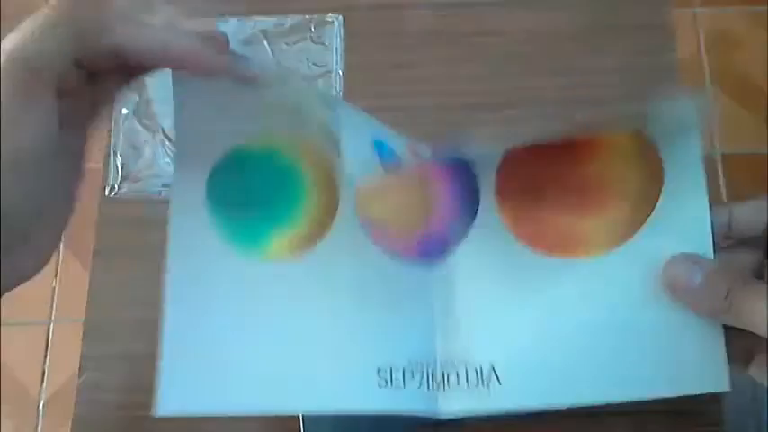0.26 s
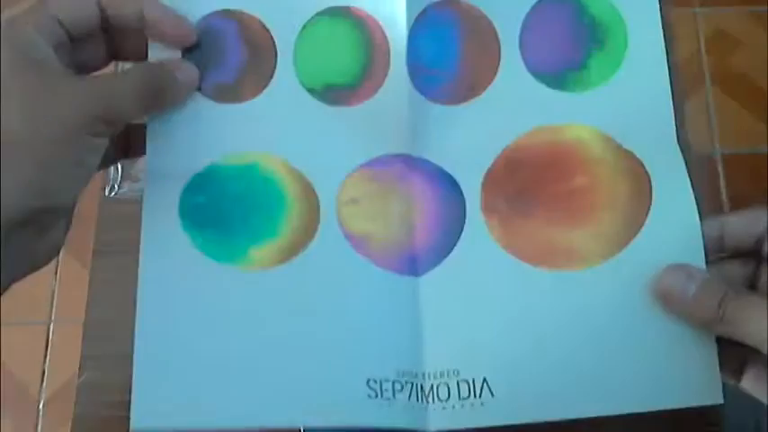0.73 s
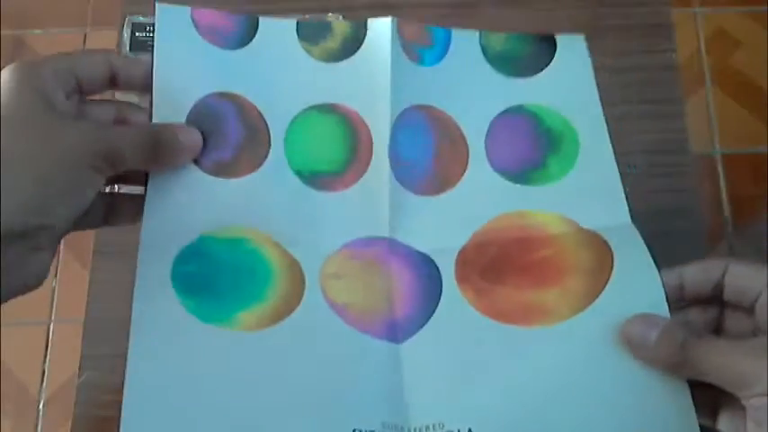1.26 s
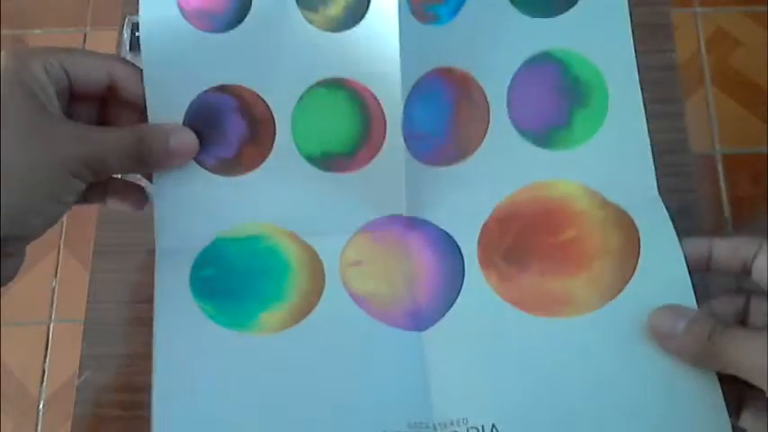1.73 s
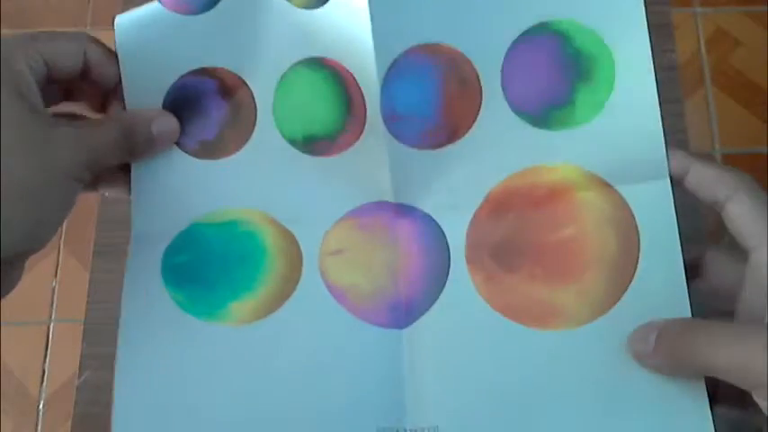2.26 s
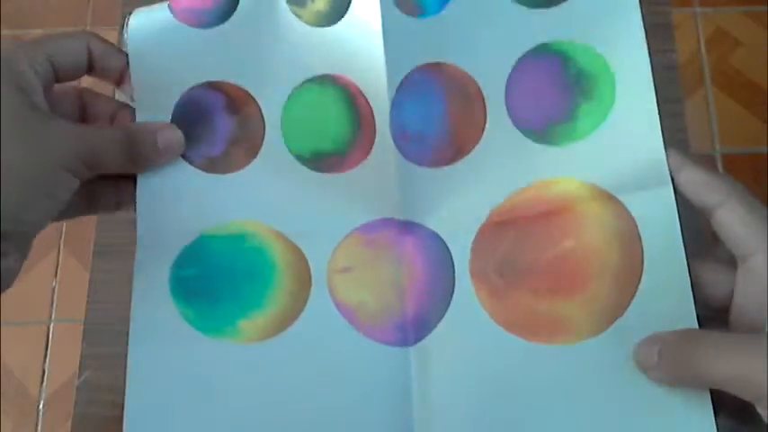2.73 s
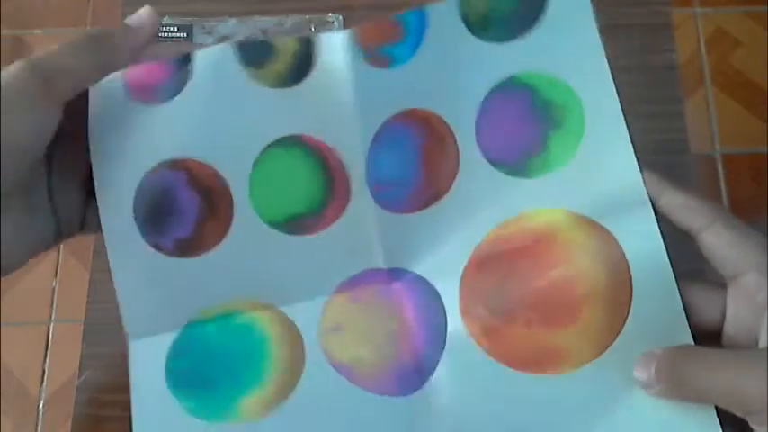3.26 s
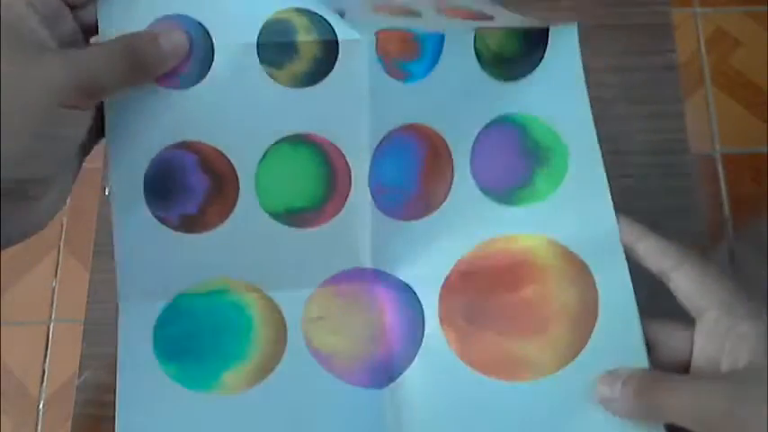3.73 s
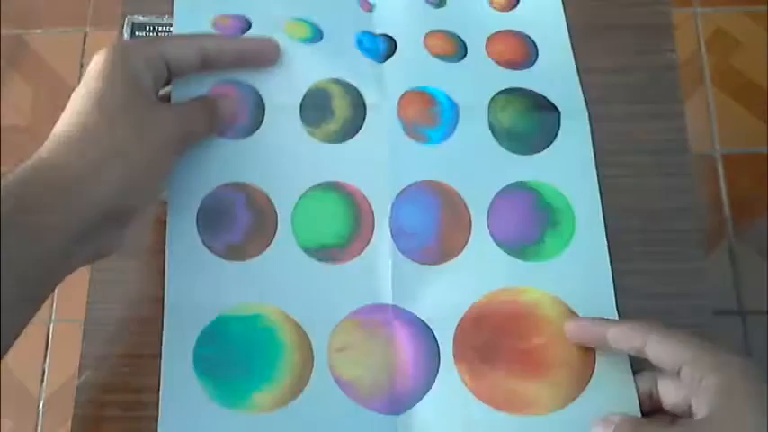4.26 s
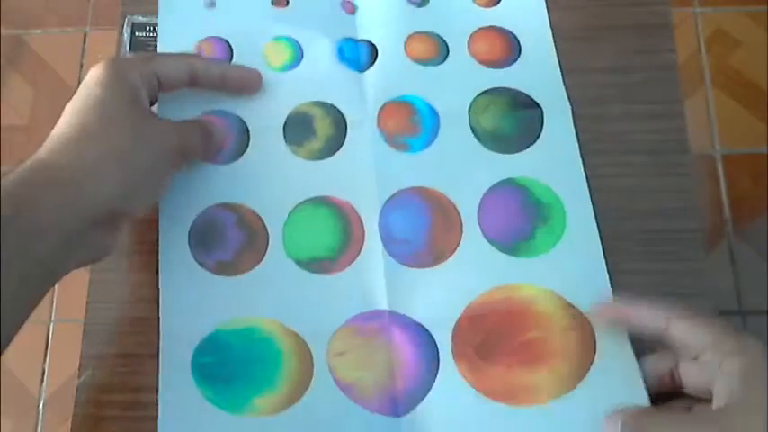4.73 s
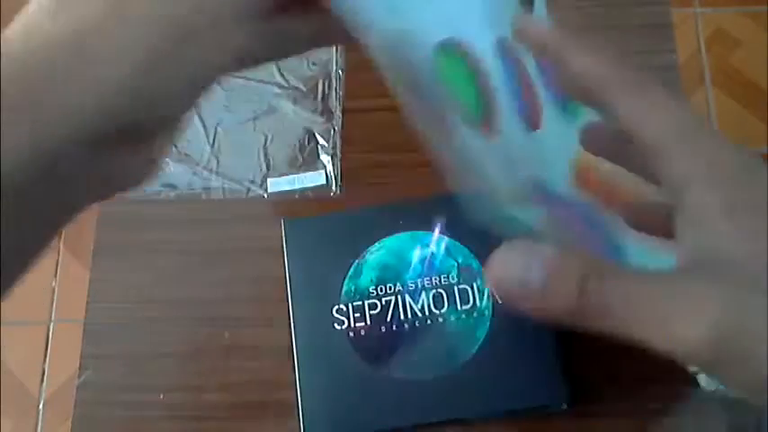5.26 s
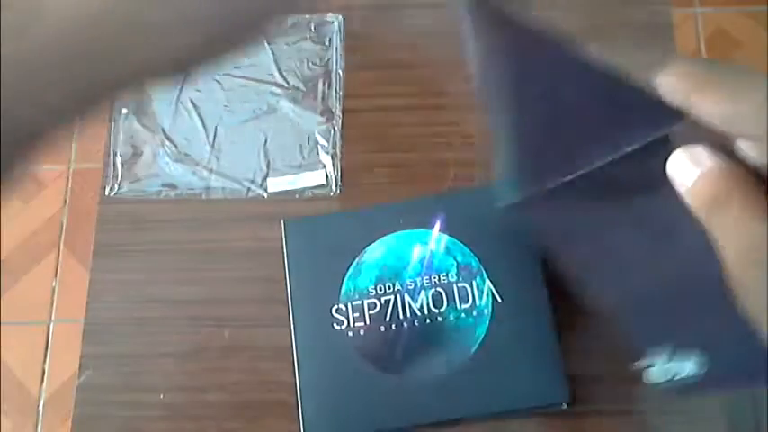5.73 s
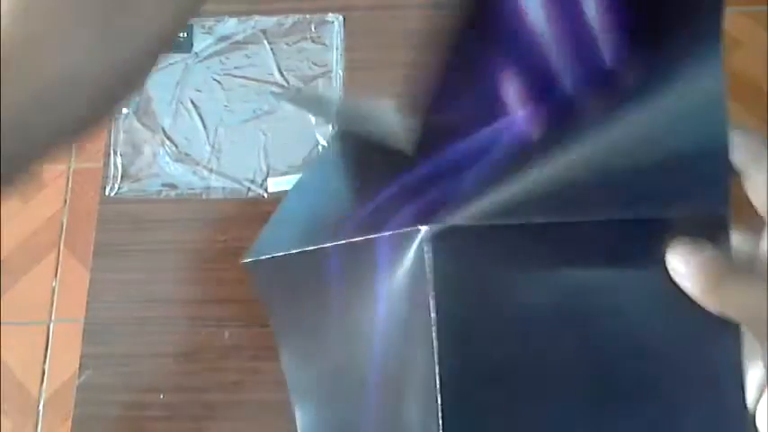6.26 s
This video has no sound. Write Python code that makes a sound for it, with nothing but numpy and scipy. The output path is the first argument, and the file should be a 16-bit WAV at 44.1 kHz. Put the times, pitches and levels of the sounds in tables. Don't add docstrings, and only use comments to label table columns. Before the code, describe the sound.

Dry, mid-pitched paper crinkles and pops in irregular clumps, the loudest snaps briefly distorting. Fingers scrape the edge and slide on the gloss, panels brush together with short swishes, and the sheet thumps the air softly. It ends with a brisk turn-over of the paper. Small indoor room, close boxy microphone, with low rumble, electrical hum and hiss.

```python
import sys
import numpy as np
from scipy import signal
from scipy.fft import rfft, irfft, next_fast_len
from scipy.io import wavfile
from scipy.ndimage import map_coordinates

SR = 44100
rng = np.random.default_rng(int(sys.argv[2]) if len(sys.argv) > 2 else 0)


def file_out(sig):
    cols = np.atleast_2d(sig).T
    lim = np.clip(cols, -1, 1)
    pcm = np.round(lim * 32767).astype(np.int16)
    wavfile.write(sys.argv[1], SR, pcm)


def voltage_ratio(level):
    return 10 ** (np.asarray(level, float) / 20)


N = 286393

# (f/Hz, level/dB)
FLAP_TONE = [(40, -27.5), (90, 6), (140, 7.5), (270, 4), (400, 5), (520, 2.5), (800, -49)]


def unit(x):
    return x / np.sqrt(np.mean(x ** 2) + 1e-20)


def along(points, hz):
    f, v = np.transpose(points)
    return np.interp(np.log(hz + 1), np.log(f + 1), v)


def curves(rows):
    s, *cols = np.transpose(rows)
    return [np.interp(np.arange(N) / SR, s, c) for c in cols]


def wobble(rate):
    knots = rng.standard_normal(int(N * rate / SR) + 4)
    return map_coordinates(knots, [np.arange(N) * rate / SR])


def coloured(x, spectrum):
    m = 8192
    gain = voltage_ratio(along(spectrum, np.fft.rfftfreq(m, 1 / SR)))
    cepstrum = irfft(np.log(gain + 1e-6))
    cepstrum[1:m // 2] *= 2
    cepstrum[m // 2 + 1:] = 0
    shape = irfft(np.exp(rfft(cepstrum)))[:m // 2]
    y = signal.fftconvolve(np.atleast_2d(x), shape[None], axes=1)
    return y[:, :np.shape(x)[-1]].reshape(np.shape(x))


def resonance(f, hz, width_hz):
    return 1j * f * width_hz / (hz ** 2 - f * f + 1j * f * width_hz)


def grains(per_s, spread_db, clump_db, clump_rate, bed):
    draw = rng.random((2, N))
    hit = draw[0] < per_s / SR
    size = voltage_ratio(-spread_db * np.log(draw[1] + 1e-9)) * rng.standard_normal(N)
    rough = unit(hit * size) + bed * rng.standard_normal(N)
    return rough * voltage_ratio(clump_db * wobble(clump_rate))


def all_creases():
    # (t/s, peak level/dB, ring f/Hz, crisp part level/dB, flap part level/dB)
    cracks = [(.0445, -9, 830, -7, -24), (0.845, -11.5, 850, -47, -13.5), (.932, -2, 892, -46, -56),
              (1.309, -11, 945, -32, -24), (1.339, -18, 880, -52, -21), (1.535, -9, 850, -38, -31),
              (1.5813, -3.5, 802, -53, -23), (1.5832, 4.2, 820, -50, -30), (2.294, -13.5, 840, -28, -16),
              (2.631, -8, 860, -27, -41), (2.667, -9, 856, -31, -21), (2.71, -11.5, 850, -38, -26),
              (2.9215, -14, 794, -25.5, -27), (3.0729, -6, 810, -52, -14.5), (3.0816, 2.6, 840, -32.5, -20),
              (3.0849, 1.3, 905, -44, -22), (3.843, -10.5, 990, -18, -12), (3.867, -6.5, 850, -58, -37),
              (3.9687, -9, 950, -23, -20.5), (4.004, -3.8, 1090, -15.5, -39),
              (4.7405, -19, 1210, -24.5, -34), (5.9548, -3, 800, -33, -12), (6.072, -13, 673, -23, -30),
              (6.43, -9, 950, -43, -22), (1.5872, -6, 880, -52, -36), (1.5893, -3, 900, -50, -20),
              (3.0763, -10, 790, -43, -19), (3.0908, -12, 840, -40, -27), (3.967, -18, 910, -30, -16),
              (4.012, -16, 990, -19, -28), (5.9515, -13.5, 1080, -13, -8.5), (5.972, -17.5, 810, -28, -11),
              (5.822, -28, 980, -18, -20), (5.849, -25, 900, -14, -24), (6.062, -23, 910, -15, -20),
              (6.212, -38, 1300, -20, -25), (0.0505, -18.5, 810, -22, -10), (.937, -9.5, 910, -40, -33),
              (5.9348, -8, 1180, -17, -13), (5.9431, -11, 980, -10, -29)]
    # (t/s, peak level/dB, ring f/Hz, crisp part level/dB)
    tears = [(.143, -24, 760, -26), (1.219, -20.5, 880, -21), (1.5, -16, 940, -31),
             (1.797, -21.5, 1020, -16.5), (1.842, -22, 980, -39), (1.942, -17.5, 960, -41),
             (1.998, -22, 720, -39), (2.212, -25, 820, -34), (2.499, -19, 1100, -25),
             (2.525, -17, 920, -27), (2.7, -13.5, 840, -22.5), (3.145, -13.5, 855, -51),
             (3.399, -18, 770, -32), (4.896, -22, 700, -35), (5.06, -20.5, 760, -39),
             (5.502, -23, 980, -32), (5.751, -18.5, 785, -31), (5.807, -17.5, 680, -32),
             (5.9209, -14, 900, -10), (5.93, -18, 1300, -18), (5.945, -16, 810, -32),
             (6.362, -17, 910, -29), (6.371, -22, 660, -43)]
    # (t/s, peak level/dB, ring f/Hz)
    pops = [(.177, -25.5, 676), (.514, -29, 815), (.644, -27, 850), (.68, -26, 755), (.702, -26, 910),
            (1.487, -20, 960), (1.514, -10.5, 940), (1.596, -18, 830), (1.806, -22, 1030),
            (1.874, -18.5, 920), (1.901, -16.5, 910), (1.913, -16, 920), (2.142, -25.5, 860),
            (2.537, -12.5, 910), (2.552, -19, 910), (2.771, -22, 840), (2.901, -17, 840), (3.022, -14, 800),
            (3.152, -9.5, 843), (3.506, -18, 945), (3.713, -8.5, 770), (3.723, -11, 870),
            (4.102, -14.5, 914), (3.826, -26, 935), (3.875, -7.5, 790), (4.725, -31, 960),
            (5.455, -19, 610), (6.317, -26, 834), (6.342, -18.5, 900)]
    # (t/s, peak level/dB, ring f/Hz)
    ticks = [(.16, -19.5, 920), (1.25, -16, 950), (1.659, -24, 950), (1.754, -18.5, 870), (2.243, -25, 900),
             (2.276, -27, 785), (2.334, -19, 1040), (2.379, -18, 990), (2.422, -21.5, 940),
             (2.445, -19.5, 980), (2.52, -22, 1020), (2.598, -14, 920), (2.651, -17.5, 860),
             (4.77, -18.5, 990), (4.809, -22, 790), (5.925, -20, 1290), (6.054, -20.5, 680)]
    # (t/s, peak level/dB, ring f/Hz)
    flips = [(.219, -24, 644), (.537, -29, 830), (.58, -30, 1070), (.59, -29, 835), (.726, -34, 770),
             (2.358, -20.5, 890), (2.724, -19.5, 790), (3.09, -19, 836), (3.227, -22, 664),
             (3.309, -26, 870), (3.68, -21, 850), (3.944, -23, 870), (5.049, -27, 920), (5.403, -23, 810),
             (5.94, -8, 640), (5.971, -13, 607), (6.091, -14.5, 800)]
    # (t/s, peak level/dB, ring f/Hz)
    further_pops = [(1.522, -13, 880), (1.556, -15, 880), (2.73, -16.5, 855), (3.066, -31, 850), (3.164, -22, 900),
                    (4.826, -21, 900), (4.845, -28, 800), (4.915, -18, 960), (4.965, -27, 770), (5.02, -28, 616),
                    (5.14, -27.5, 950), (5.293, -28, 1070), (1.626, -29, 900), (3.408, -18, 855), (3.52, -29, 880),
                    (3.553, -25, 980), (5.824, -21, 800), (6.1, -16, 860)]
    # (t/s, peak level/dB, ring f/Hz)
    links = [(1.7995, -11, 1080), (1.8135, -12, 1020), (1.8275, -13, 980), (1.836, -14, 980),
             (1.789, -20, 1000), (1.885, -20, 950), (1.958, -17, 1050), (1.73, -24, 900), (1.712, -24, 950),
             (2.011, -26, 800), (1.5445, -15, 900), (1.527, -16, 950), (1.502, -16, 900), (1.574, -21, 900),
             (1.601, -16, 830), (1.46, -22, 900), (2.9245, -9, 840), (2.968, -22, 850), (3.099, -13, 850),
             (3.1465, -11, 850), (3.86, -16, 900), (3.871, -10, 850), (2.632, -11, 860), (2.654, -15, 880),
             (2.67, -15, 840), (2.612, -23, 900), (4.9005, -12, 800), (4.7435, -15, 1030),
             (5.5065, -15, 1030), (5.589, -24, 1500), (5.608, -24, 900), (5.478, -26, 1100),
             (5.694, -23, 670), (1.293, -25, 800), (.907, -30, 800), (3.282, -25, 990), (3.641, -28, 850),
             (3.79, -24, 1000), (4.343, -27, 1040), (4.711, -28, 960), (5.095, -25, 770), (5.248, -29, 830),
             (5.332, -27, 1000), (6.132, -25, 830), (2.105, -32, 900), (.419, -34, 830), (.558, -31, 860),
             (4.241, -32, 890), (1.3425, -9, 830), (6.378, -15, 900), (6.486, -22, 900), (4.784, -23, 1000),
             (1.132, -27, 900), (5.963, -13, 750)]
    # (crisp part level/dB, flap part level/dB, die-away t60/s)
    link = (-38, -26, .012)
    pop, tick, flip = (-44, -29, 0.024), (-23, -15.5, 0.03), (-31, -10, 0.011)
    crack_t60_s, tear_t60_s, tear_flap_db = 0.016, 0.049, -16.5

    creases = [(*row, crack_t60_s) for row in cracks]
    creases += [(*row, tear_flap_db, tear_t60_s) for row in tears]
    for rows, kind in ((pops, pop), (ticks, tick), (flips, flip), (further_pops, pop), (links, link)):
        creases += [(*row, *kind) for row in rows]
    return creases


def snaps():
    # (f/Hz, level/dB)
    crisp_tone = [(900, 0.5), (1800, 1.5), (2500, -13), (3300, -25), (5000, -15), (6200, -2), (7400, -29.5),
                  (16000, -55)]
    s, peak_db, ring_hz, crisp_db, flap_db, t60 = (c[:, None] for c in np.transpose(all_creases()))
    size = 4096
    t, f = np.arange(size) / SR, np.fft.rfftfreq(2 * size, 1 / SR)
    noise = rng.standard_normal((len(s), 3 * size)).reshape(len(s), 3, size)

    onset = 1 - np.exp(-t / (0.00024 + 1.8 * t60 ** 2))
    fade = voltage_ratio(-60 * t / np.clip(t60, 0.004, 0.2)) * onset
    jump = np.sign(noise[:, 0, :1]) * 1.15 * np.exp(-(t60 / 0.056) ** 2)
    jump = jump * np.exp(-((t - 0.0004) / 0.00009) ** 2)

    sheet = resonance(f, ring_hz, 0.38 * ring_hz) ** 2 / (1 + 1j * f / 1300) ** 3
    ring = irfft(rfft(noise[:, 0] * fade + jump, 2 * size) * sheet)[:, :size]
    crisp = coloured(noise[:, 1] * fade ** 4.2, crisp_tone)
    flap = coloured(noise[:, 2] * fade ** 0.42, FLAP_TONE)

    def to_peak(v):
        return v / np.abs(v).max(1, keepdims=True)

    burst = to_peak(ring) + voltage_ratio(crisp_db + 6.5) * to_peak(crisp) + voltage_ratio(flap_db - 0.5) * to_peak(flap)
    burst = voltage_ratio(peak_db) * burst
    where = np.round((s - 0.0007) * SR).astype(int) + np.arange(size)
    return np.bincount(where.ravel(), burst.ravel(), N + size)[:N]


def strokes():
    # (firmest t/s, length/s, hiss on the gloss level/dB, scrape on the edge level/dB)
    touches = [(.01, 0.029, -49, -60), (0.142, .04, -53, -60), (1.222, 0.19, -56, -63),
               (1.313, 0.015, -43, -63), (1.428, 0.034, -52, -53), (1.75, 0.1, -49.5, -45.5),
               (1.78, 0.051, -38, -56), (1.963, 0.15, -56, -58), (2.375, 0.13, -56, -40.5),
               (2.503, 0.04, -60, -39), (2.66, .19, -56.5, -52), (2.79, 0.029, -47, -56),
               (2.887, 0.084, -52, -54), (3.124, 0.068, -53, -44), (3.279, 0.2, -57.5, -50),
               (3.347, 0.082, -54, -66), (3.524, 0.043, -51.5, -47.5), (3.738, 0.081, -52.5, -50),
               (3.846, 0.016, -42, -62), (4.025, 0.06, -48, -35), (4.306, 1, -68, -55.5),
               (4.776, 0.15, -51, -47.5), (5.058, 0.11, -52.5, -51), (5.33, 0.35, -64, -54.5),
               (5.56, 0.23, -51.5, -44), (5.75, 0.11, -47, -35.5), (5.866, 0.13, -43.5, -48.5),
               (5.955, 0.05, -36.5, -25.5), (5.97, 0.017, -37, -45), (6.06, 0.1, -56, -47),
               (6.458, 0.63, -58, -60)]
    drop_db, rise = 13, 0.52
    t, power = np.arange(N) / SR, np.zeros((2, N))
    for s, length, hiss_db, scrape_db in touches:
        away = np.abs(t - s) / np.where(t < s, rise * length, length)
        power += voltage_ratio(-2 * drop_db * away) * voltage_ratio([[2 * hiss_db], [2 * scrape_db]])
    return np.sqrt(power)


def handling():
    # (t/s, crinkle level/dB, air flap level/dB)
    hands = [(0.0, -41.5, -45), (0.4, -47.5, -52), (0.78, -49.5, -52.5), (1.48, -30.5, -41),
             (1.81, -35, -56), (2.04, -43, -52), (2.24, -45.5, -47.5), (2.48, -36.5, -43.5),
             (3.65, -42.5, -43), (3.94, -32.5, -40.5), (4.36, -46.5, -49.5), (4.72, -48.5, -46),
             (4.9, -42, -41), (5.31, -41, -44), (5.97, -33, -36.5), (6.14, -43.5, -43), (6.34, -45, -48.5),
             (6.49, -33.5, -39)]
    # (f/Hz, level/dB)
    crinkle_tone = [(250, -19), (500, -10.5), (620, -5), (860, 2.5), (1150, -5.5), (1500, -21),
                    (2000, -36.5), (4000, -51.5)]
    # (f/Hz, level/dB)
    scrape_tone = [(700, -29.5), (1200, 23), (1700, 16), (2400, 3.5), (3200, -8), (4400, -10), (5200, -21),
                   (9000, -60)]
    # (f/Hz, level/dB)
    slide_tone = [(3000, -25.5), (4800, -10.5), (5800, -7.5), (6200, 7), (6600, -6), (7300, -42),
                  (11000, -28), (16000, -35)]
    crinkle_db, flap_db = curves(hands)
    hiss_gain, scrape_gain = strokes()
    buckles = grains(per_s=500, spread_db=2.0, clump_db=3.0, clump_rate=50, bed=0.82)
    rubbing = grains(per_s=1800, spread_db=2.5, clump_db=4.0, clump_rate=64, bed=0.81)

    crinkle = voltage_ratio(crinkle_db - 1.1) * unit(coloured(buckles, crinkle_tone))
    scrape_gain = voltage_ratio(1.5) * scrape_gain + voltage_ratio(crinkle_db - 35)
    scrape = scrape_gain * unit(coloured(0.13 * buckles + rubbing, scrape_tone))
    slide_gain = voltage_ratio(-6.0) * hiss_gain + voltage_ratio(crinkle_db - 36.5)
    slide = slide_gain * unit(coloured(0.16 * buckles + rubbing, slide_tone))
    gusts = rng.standard_normal(N) * voltage_ratio(3 * wobble(15))
    flap = voltage_ratio(flap_db - 1.5) * unit(coloured(0.7 * buckles + gusts, FLAP_TONE))
    return crinkle + scrape + slide + flap


def swishes():
    # (loudest t/s, fall time/s, level/dB, centre f/Hz, width/Hz)
    brushes = [(0.15, 0.027, -35.5, 1210, 830), (1.167, 0.18, -46, 401, 30), (1.806, 0.026, -27, 1014, 334),
               (1.946, 0.055, -33, 1070, 390), (2.45, 0.032, -41, 1670, 1650),
               (3.332, 0.067, -30.5, 858, 328), (3.499, 0.027, -35.5, 122, 60),
               (3.839, 0.047, -27, 960, 580), (5.545, .035, -38, 1150, 800),
               (5.575, 0.035, -36, 1500, 1000), (5.754, 0.035, -29, 1080, 780),
               (5.814, 0.13, -56, 4250, 2200), (5.805, 0.059, -52, 2600, 900),
               (5.938, 0.015, -18, 1390, 1430), (5.963, 0.033, -33.5, 109, 140),
               (5.792, 0.035, -35.5, 200, 305), (6.123, 0.029, -34.5, 380, 400),
               (1.144, 0.073, -41, 1040, 600), (1.589, 0.0058, -20.5, 360, 202),
               (3.732, 0.022, -33.5, 202, 160), (4.339, 0.021, -37.5, 1030, 400),
               (4.905, 0.0059, -30.5, 203, 253), (5.34, 0.15, -43.5, 1180, 604),
               (5.7, 0.026, -36.5, 570, 300), (6.371, 0.005, -28.5, 252, 250)]
    rise = 0.75
    out, size = np.zeros(N + SR), 2 ** 14
    t, f = (np.arange(size) - size // 2) / SR, np.fft.rfftfreq(size, 1 / SR)
    rubbing = grains(per_s=890, spread_db=-6.0, clump_db=4.0, clump_rate=89, bed=1.0)
    rubbing = np.pad(rubbing, size // 2, mode="wrap")
    deaf = 1 - 0.68 * np.exp(-((f - 3400) / 600) ** 2)
    for s, fall, db, hz, width_hz in brushes:
        at = round(s * SR)
        gap = resonance(f, hz, width_hz) ** 3
        band = irfft(rfft(rubbing[at:at + size]) * gap * deaf)
        swell = np.exp(-(t / np.where(t < 0, rise * fall, fall)) ** 2)
        out[at:at + size] += voltage_ratio(db) * unit(band * swell) * np.sqrt(np.mean(swell ** 2))
    return out[size // 2:][:N]


def room(x):
    # (f/Hz, die-away t60/s)
    die_away = [(150, 0.42), (900, 0.27), (3000, 0.2), (8000, 0.19)]
    hz, t, z = signal.stft(rng.standard_normal(SR // 2), SR, nperseg=256)
    fading = z * voltage_ratio(-60 * t / along(die_away, hz)[:, None])
    tail = signal.istft(fading, SR, nperseg=256)[1]
    late = np.pad(x, (250, 0))
    return signal.fftconvolve(late, tail / np.linalg.norm(tail))[:N]


def housing(x):
    # (f/Hz, width/Hz, boost/dB)
    modes = [(4380, 220, -4), (5330, 165, -4.5), (8420, 260, 2), (10800, 290, 4.5), (13600, 250, 4.5),
             (15400, 300, 1)]
    m = next_fast_len(N + 4096)
    f = np.fft.rfftfreq(m, 1 / SR)
    boost = 1 + sum(voltage_ratio(db) * resonance(f, hz, width_hz) for hz, width_hz, db in modes)
    return irfft(rfft(x, m) * boost, m)[:N]


def background():
    # (f/Hz, rms level/dB)
    mains = [(50, -45), (150, -53), (252, -60)]
    # (f/Hz, level/dB)
    quiet_tone = [(15, -3.5), (70, -6), (200, -10), (500, -12.5), (1100, -18.5), (1600, -22), (2200, -26),
                  (4000, -30.5), (6200, -31.5), (7500, -33), (16000, -35.5)]
    t = np.arange(N) / SR
    tones = np.zeros(N)
    for hz, db in mains:
        tones += voltage_ratio(db + 2.3 * wobble(15)) * np.sin(2 * np.pi * hz * t + 0.3 * wobble(5.2))
    # Hz, dB rms, dB of its partner one frame rate (15 Hz) higher
    for hz, db, side_db in ((1803, -70, -1), (3606, -77, -3), (9015, -85, -6)):
        pair = np.sin(2 * np.pi * hz * t) + voltage_ratio(side_db) * np.sin(2 * np.pi * (hz + 15) * t)
        tones += voltage_ratio(db + 1.5 * wobble(3.78)) * pair
    rumble_tone = [(15, 4.5), (40, -0.5), (62, 3), (85, 2.5), (200, -40.0)]  # (Hz, dB)
    rumble = voltage_ratio(-48.0) * unit(coloured(rng.standard_normal(N), rumble_tone))
    hiss = voltage_ratio(-51) * unit(coloured(rng.standard_normal(N), quiet_tone))
    return np.sqrt(2) * tones + rumble + hiss


def scene():
    creases = snaps()
    paper = creases + voltage_ratio(-13) * room(creases) + handling() + swishes()
    return (housing(paper) + background())[None]


def roll_off(x):
    return signal.sosfilt(signal.butter(12, 16440, fs=SR, output="sos"), x)


def record(dry):
    x = np.clip(dry + 0.0221, -1.02, 1.02)
    band_limit = signal.ellip(10, 0.1, 50, 15700, fs=SR, output="sos")
    return roll_off(signal.sosfiltfilt(band_limit, x))


dry = scene()
out = record(dry)
file_out(out)
```